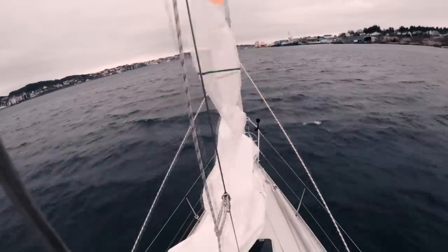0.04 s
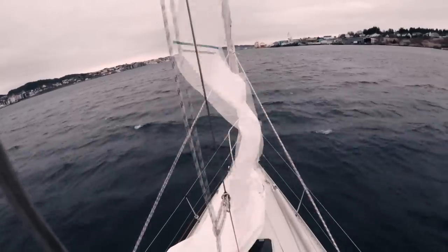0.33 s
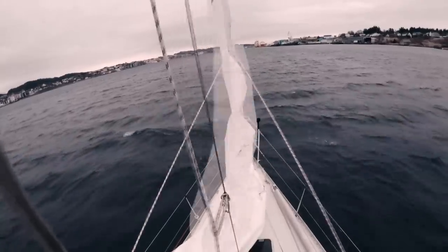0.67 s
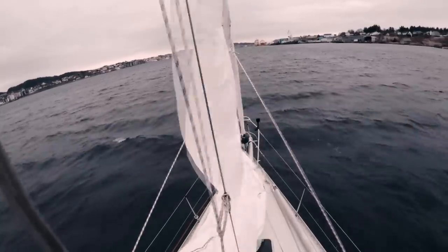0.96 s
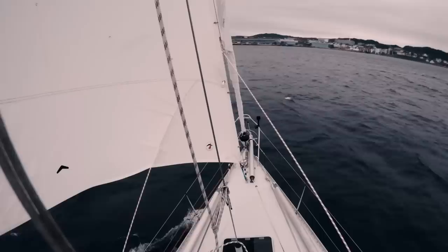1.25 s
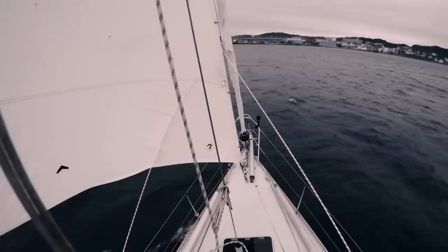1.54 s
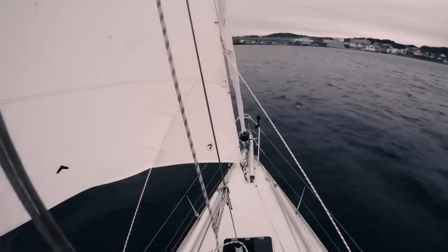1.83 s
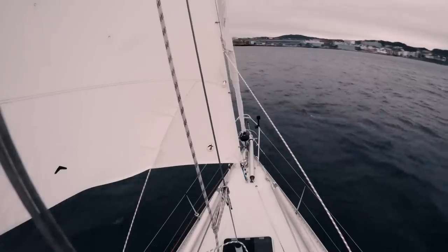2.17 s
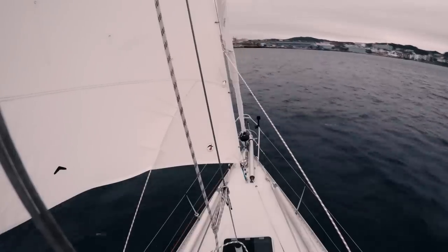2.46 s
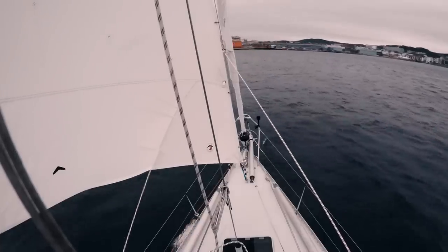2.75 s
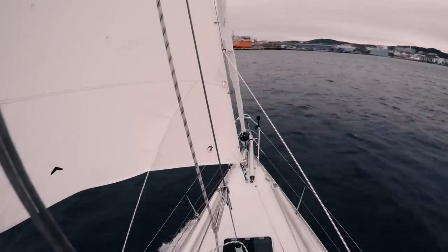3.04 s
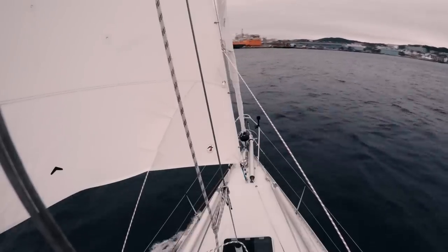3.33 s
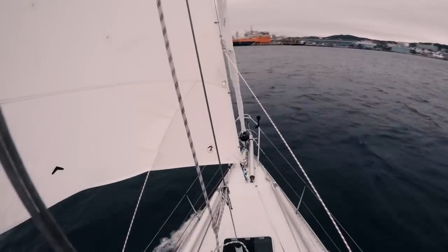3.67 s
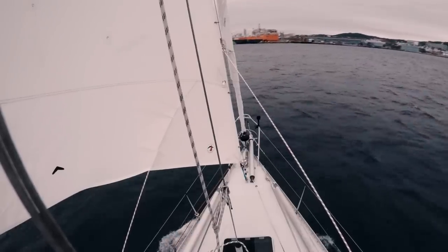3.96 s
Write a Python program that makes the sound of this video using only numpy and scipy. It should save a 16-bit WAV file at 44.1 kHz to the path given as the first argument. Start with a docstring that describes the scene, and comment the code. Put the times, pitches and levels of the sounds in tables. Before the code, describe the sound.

A loose sail flogs on a sailing boat, stiff cloth rustling and cracking while ropes thud. The sail then fills and goes quiet, leaving wind rumbling on the microphone and water rushing and splashing along the hull.

```python
"""A flogging jib fills

On the deck of a sailing boat a loose jib flogs: stiff cloth rustles and cracks, the sheets thud,
and thrown air buffets the microphone. From about 1.3 s the sail is full and quiet: turbulent wind
rumbles and water rushes along the hull, with a few small splashes and one bow wave that breaks
into a hiss of bursting bubbles."""
import sys
import numpy as np
from scipy import signal
from scipy.fft import rfft, irfft
from scipy.io import wavfile
from scipy.ndimage import uniform_filter1d

SR = 44100
rng = np.random.default_rng(int(sys.argv[2]) if len(sys.argv) > 2 else 0)


def waveform_to_disk(signal):
    """Save audio, clipped to [-1, 1], as 16-bit WAV at the path in sys.argv[1]."""
    frames = np.transpose(np.atleast_2d(signal))
    scaled = np.clip(frames, -1, 1) * 32767
    samples = np.round(scaled).astype(np.int16)
    wavfile.write(sys.argv[1], SR, samples)


N = 176400
T = np.arange(N) / SR

# Envelopes: t/s, level/dB
WIND_LEVEL = [(0, -22), (.3, -25), (.45, -21), (.66, -29), (.85, -24.5), (1.25, -17.5), (1.6, -20),
              (2.1, -17.5), (2.35, -20), (2.65, -24), (2.85, -19), (3.05, -19), (3.25, -22.5), (3.7, -19),
              (4, -21)]
RUSH_LEVEL = [(0, -34), (.35, -35.5), (.55, -29), (.75, -31), (1.2, -29.5), (1.33, -37.5), (1.55, -38.5),
              (1.7, -37), (1.85, -39.5), (2.1, -38.5), (2.3, -37), (2.65, -36.5), (3.05, -37), (3.27, -37),
              (3.5, -38.5), (4, -38.5)]
HOLLOW_GAIN = [(0, -4.5), (1.5, -1), (2.3, -1.5), (2.6, 1), (3.2, 3), (4, -1)]
FOAM_LEVEL = [(0, -50.5), (1.3, -48), (1.45, -54), (1.55, -50), (1.62, -54), (1.7, -46.5), (1.77, -59),
              (2.05, -51), (2.19, -48), (2.3, -42), (2.45, -42.5), (2.6, -40), (2.85, -45), (3.2, -46),
              (3.45, -46.5), (4, -46)]
SLOP_LEVEL = [(2.05, -65), (2.19, -47), (2.26, -38.5), (2.6, -41.5), (2.8, -46), (3.1, -55), (4, -55)]
# Spectra: f/Hz, relative level/dB
WIND_SPECTRUM = [(8, -13), (22, -1), (42, 0), (60, -4.5), (85, -9), (110, -9), (150, -18.5), (200, -25),
                 (260, -31), (600, -46), (2000, -71)]
PUFF_SPECTRUM = [(8, -15.5), (24, 1), (38, -4.5), (58, -7), (100, -14.5), (160, -28), (260, -41),
                 (600, -44), (2000, -90)]
GUST_SPECTRUM = [(8, -11), (25, -1), (45, 2.5), (65, -5.5), (100, -22.5), (200, -39), (2000, -76)]
RUSH_SPECTRUM = [(100, -3), (250, 0.5), (450, -1), (700, -3.5), (1000, -7.5), (1500, -12), (2500, -17.5),
                 (5000, -26.5), (8000, -36.5), (15000, -49.5)]
FOAM_SPECTRUM = [(400, -12.5), (1000, 2.5), (1700, -2.5), (2800, 0), (4000, -4), (5200, -5.5),
                 (7000, -11.5), (11000, -19.5), (15000, -32)]
SPRAY_SPECTRUM = [(1000, -20), (3000, 7), (6000, 5.5), (8000, 0.5), (11500, -3), (15000, -16)]
SLOP_SPECTRUM = [(300, -20), (700, 3.5), (1030, 5), (1500, -20.5), (2150, -4.5), (2800, -3.5), (3600, -17),
                 (8000, -27.5)]
CLOTH_SPECTRUM = [(150, -12), (400, 6), (800, 4), (1400, -1.5), (2700, -1), (4000, -3.5), (5800, -8.5),
                  (7500, -19), (10000, -28), (15000, -37)]
TICK_SPECTRUM = [(2000, -23), (7000, 1), (10000, 9.5), (15000, -7)]
# Pushes of air: start t/s, duration/s, level/dB
SAIL_PUFFS = [(-.015, 0.064, -7), (.19, 0.05, -9), (.378, 0.065, -14.5), (.497, .06, -9),
              (0.734, 0.052, -10.5), (.805, 0.063, -12.5), (0.884, 0.094, -13), (1.003, .075, -11.5)]
GUSTS = [(1.72, .03, -15.5), (2.265, 0.044, -12.5), (2.335, 0.02, -10.5), (2.42, .04, -10.5),
         (2.5, 0.031, -11.5), (2.58, 0.02, -10), (2.65, 0.039, -11.5), (2.975, 0.075, -16.5),
         (3.415, 0.039, -15.5), (3.665, 0.028, -14), (3.75, 0.041, -17.5)]
# Hollow resonances in the wind: f/Hz, bandwidth/Hz, relative level/dB
HOLLOW_MODES = [(207.6, 27, -43.5), (306.6, 63, -40), (940, 29, -57.5)]
# Spray from the bow: peak t/s, level/dB, rise/s, decay/s
SPRAYS = [(1.359, -47, .003, .008), (1.522, -48, .008, .014), (1.556, -50, 0.0056, .006),
          (1.611, -46, .001, .002), (1.651, -41.5, 0.0018, 0.0035), (1.954, -47, .002, .004),
          (2.34, -45, .07, 0.22), (3.145, -45, .006, 0.02), (3.285, -46.5, .02, .025),
          (3.48, -53, 0.076, 0.17), (3.92, -54, .03, 0.072)]
# Folds running through the cloth: peak t/s, level/dB, rise/s, decay/s, ring f/Hz, treble lift/dB
FOLDS = [(0.011, -27.5, 0.01, 0.012, 2550, -1), (.068, -34.5, 0.012, 0.016, 4200, 3),
         (.111, -39, .002, 0.049, 1400, -3), (.172, -28.5, .001, .012, 3000, 0),
         (.198, -27.5, 0.00092, 0.014, 5100, 2), (0.233, -31, 0.011, 0.039, 2580, 2),
         (.267, -27.5, .002, 0.019, 3900, -2), (.318, -33.5, .002, 0.022, 2760, 3),
         (0.419, -30, 0.024, .025, 4000, 2), (.462, -33, 0.0097, 0.039, 2800, 6),
         (0.513, -24, 0.0036, 0.011, 5600, -3), (0.545, -24, 0.0041, 0.013, 2160, -12),
         (.561, -24.5, 0.0059, 0.012, 1700, -16), (.582, -28.5, .002, 0.01, 5500, -10),
         (.608, -32, 0.0067, 0.018, 3600, 7), (0.635, -26.5, 0.008, .032, 1900, -3),
         (.727, -35.5, 0.0094, 0.013, 3200, 6), (0.76, -31.5, 0.0033, 0.013, 1200, -2),
         (.796, -26.5, 0.013, .02, 2730, 4), (0.83, -27, 0.0024, 0.0064, 3500, 2),
         (0.887, -28, 0.0067, 0.019, 2600, -1), (0.91, -29.5, 0.0032, 0.021, 3300, 0),
         (0.963, -26, 0.0098, 0.013, 1300, 0), (.99, -29.5, 0.009, .01, 2200, 3),
         (1.025, -30.5, 0.0035, 0.015, 5000, 0), (1.05, -28.5, .001, 0.018, 3500, 0),
         (1.064, -30.5, 0.0048, 0.028, 2700, 7), (1.107, -26, .001, 0.011, 3900, -6),
         (1.122, -26, 0.0027, .022, 3000, 4), (1.164, -29, 0.016, 0.017, 2200, -5),
         (1.219, -28.5, .012, 0.022, 2570, 1), (1.249, -36, .002, .008, 3580, -4)]
# Dull blows: t/s, peak level/dB, ring f/Hz
SHEET_THUDS = [(.012, -21, 686), (.124, -23.5, 793), (.476, -15.5, 520), (.561, -21, 863), (.578, -12, 680),
               (.628, -21, 633), (.654, -17.5, 730), (.692, -16.5, 560), (.759, -20.5, 630),
               (.841, -28, 480), (0.88, -24, 450), (.962, -16, 917), (1.012, -22, 447), (1.164, -14.5, 533)]  # sheets and sail corner jerking
BELLY_THUMPS = [(.203, -15.5, 115), (.496, -15.5, 136), (.755, -20, 168.5), (.838, -16, 131),
                (.854, -11, 140.3), (.935, -18, 129), (1.003, -16, 141), (1.025, -18, 147)]  # the belly of the sail filling
# Cloth snapping taut: t/s, peak level/dB, treble tilt/dB
CRACKS = [(0.1269, -21, 0), (0.1731, -21, 4), (0.1989, -16, -1), (.2402, -24, 5), (.247, -9, 4.5),
          (0.5161, -12, 1.5), (0.7962, -27, -4), (0.8848, -19, 2), (0.9637, -22, -13), (1.0503, -16, 3),
          (1.122, -18, 6.5), (1.165, -16.5, -2.5), (1.251, -20, -2)]
# Thin, bright ticks: t/s, peak level/dB
TICKS = [(.2474, -25.5), (.47, -35), (.8797, -29.5), (.955, -26), (1.1385, -31)]


def amp(db):
    """Amplitude ratio: tenfold for every 20 dB."""
    return 10 ** (np.asarray(db) / 20)


def unit(x):
    """Normalisation to unit rms."""
    return x / np.sqrt(np.mean(x ** 2) + 1e-20)


def level(points):
    """Amplitude envelope, interpolated in decibels."""
    return amp(np.interp(T, *np.transpose(points)))


def add(mix, s, sound):
    """Superposition of a sound starting at time s."""
    at = round(s * SR)
    sound = sound[max(-at, 0):]
    part = mix[max(at, 0):][:len(sound)]
    part += sound[:len(part)]


def colour(x, spectrum):
    """Minimum-phase filtering to unit rms; the Hilbert transform derives phase from log gain."""
    hz, db = np.transpose(spectrum)
    f = abs(np.fft.fftfreq(len(x), 1 / SR))
    log_gain = np.log(amp(np.interp(np.log(f + 1), np.log(hz), db)))
    response = np.exp(np.conj(signal.hilbert(log_gain)))
    return unit(np.fft.ifft(np.fft.fft(x) * response).real)


def shaped_noise(gain_at, size=N):
    """Spectral weighting of white noise by a function of frequency, at unit rms."""
    f = np.fft.rfftfreq(size, 1 / SR)
    return unit(irfft(rfft(rng.standard_normal(size)) * gain_at(f), size))


def flutter(rate_hz, depth_db):
    """Random amplitude modulation by low-pass noise."""
    return amp(depth_db * shaped_noise(lambda f: 1 / (1 + (f / rate_hz) ** 4)))


def grains(per_s, spread_db, size=N):
    """Shot noise: independent impulses, most small and a few large."""
    height = amp(spread_db * np.minimum(rng.exponential(1, size), 5))
    return height * rng.choice([-1, 1], size) * (rng.random(size) < per_s / SR)


def bursts(rows, edge_s=0.0156):
    """Trapezoidal envelopes for short pushes of air."""
    return sum(amp(db) * np.clip(np.minimum(T - s, s + length - T) / edge_s + 0.5, 0, 1)
               for s, length, db in rows)


def buffeting(spectrum, steadiness):
    """Turbulent pressure: low noise, its lulls and peaks evened out by envelope compression."""
    pressure = colour(rng.standard_normal(N), spectrum)
    power = uniform_filter1d(abs(signal.hilbert(pressure)) ** 2, size=1700)
    return unit(pressure / power ** (steadiness / 2))


def wind():
    """Turbulence at the microphone: a rumble, puffs thrown by the swinging sail, and later gusts."""
    rumble = level(WIND_LEVEL) * buffeting(WIND_SPECTRUM, steadiness=0.4)
    rumble *= flutter(rate_hz=18, depth_db=1.5)
    puffs = bursts(SAIL_PUFFS) * buffeting(PUFF_SPECTRUM, steadiness=0.45)
    gusts = bursts(GUSTS) * buffeting(GUST_SPECTRUM, steadiness=1.0)
    return rumble + puffs + gusts


def rush():
    """Broadband flow noise of air and water round the boat, with narrow, hollow resonances."""
    hollow = sum(amp(db) * shaped_noise(lambda f: 1 / (1 + (2 * (f - hz) / width) ** 2))
                 for hz, width, db in HOLLOW_MODES)
    flow = level(RUSH_LEVEL) * colour(rng.standard_normal(N), RUSH_SPECTRUM)
    flow *= flutter(rate_hz=25, depth_db=0.93)
    return flow + level(HOLLOW_GAIN) * hollow * flutter(rate_hz=10, depth_db=2.14)


def water():
    """Shot noise of bursting foam, the slopping bow wave and drops of spray falling back."""
    bubbles = colour(grains(per_s=9000, spread_db=2.5), FOAM_SPECTRUM)
    foam = level(FOAM_LEVEL) * bubbles * flutter(rate_hz=25, depth_db=1.0)
    slop = level(SLOP_LEVEL) * colour(grains(per_s=2500, spread_db=3.0), SLOP_SPECTRUM)
    drops = colour(grains(per_s=6500, spread_db=4.0), SPRAY_SPECTRUM)
    splashes = sum(amp(db) * np.exp(np.minimum((T - s) / rise, (s - T) / decay))
                   for s, db, rise, decay in SPRAYS)
    return foam + slop + splashes * drops


def rustle(ring_db=4, ring_ratio=1.47):
    """Impulse excitation: each fold sets off crinkles in the stiff sail, ringing at its own pitch."""
    out, t = np.zeros(N), T[:16384] - T[2048]  # t = 0 at the fold's peak
    for s, db, rise, decay, hz, lift_db in FOLDS:
        crinkles = colour(grains(per_s=3000, spread_db=3.5, size=len(t)), CLOTH_SPECTRUM)
        resonance = [(hz / ring_ratio, 0), (hz, ring_db), (hz * ring_ratio, 0), (10000, lift_db)]
        envelope = np.exp(np.minimum(t / rise, -t / decay))
        add(out, s + t[0], amp(db) * colour(crinkles, resonance) * envelope)
    return out


def thuds(rows, decay_s, octaves, rattle_gain):
    """Damped oscillation: each blow rings one mode, with a band of rattle round it."""
    out, t = np.zeros(N), T[:8192]
    envelope = (1 - np.exp(-t / 0.0004)) * np.exp(-t / decay_s)
    for s, db, hz in rows:
        rattle = shaped_noise(lambda f: 1 / (1 + (np.log2((f + 1) / hz) / octaves) ** 4), len(t))
        thud = (np.sin(2 * np.pi * hz * t) + rattle_gain * rattle) * envelope
        add(out, s, amp(db) * thud / abs(thud).max())
    return out


def cracks(decay_s=0.00039):
    """Broadband transients: cloth snapping taut radiates a pulse with a very short noisy tail."""
    out, t = np.zeros(N), T[:2048]
    for s, db, tilt_db in CRACKS:
        pulse = 0.62 * rng.standard_normal(len(t)) * np.exp(-t / decay_s)
        pulse[0] = 1
        tilt = [(1500, -tilt_db), (4000, 0), (10000, tilt_db)]
        snap = colour(colour(pulse, CLOTH_SPECTRUM), tilt)
        add(out, s, amp(db) * snap / abs(snap).max())
    return out


def ticks():
    """The impulse response of a treble band, heard as thin ticks."""
    out = np.zeros(N)
    tick = colour(signal.unit_impulse(2048), TICK_SPECTRUM)
    for s, db in TICKS:
        add(out, s, amp(db) * tick / abs(tick).max())
    return out


def scene():
    """Superposition of sail, wind and water at one point in the open air."""
    sheets = thuds(SHEET_THUDS, decay_s=0.0071, octaves=0.9, rattle_gain=0.81)
    belly = thuds(BELLY_THUMPS, decay_s=0.015, octaves=0.5, rattle_gain=0.43)
    sail = rustle() + sheets + cracks() + belly + ticks()
    return (sail + wind() + rush() + water())[None]


def record(dry, cutoff_hz=15300):
    """Band limiting by a linear-phase low-pass filter."""
    lowpass = signal.firwin(511, cutoff_hz, window=("kaiser", 9), fs=SR)
    return signal.oaconvolve(dry, lowpass[None], "same")


dry = scene()
out = record(dry)
waveform_to_disk(out)
```